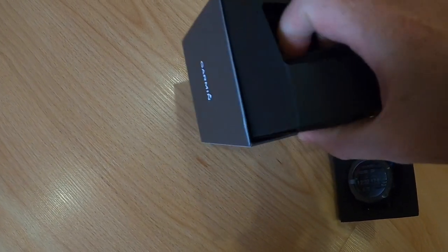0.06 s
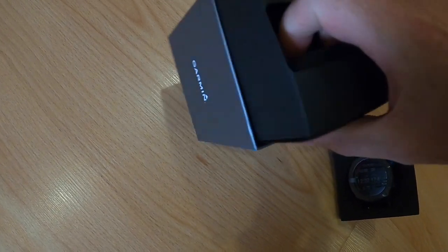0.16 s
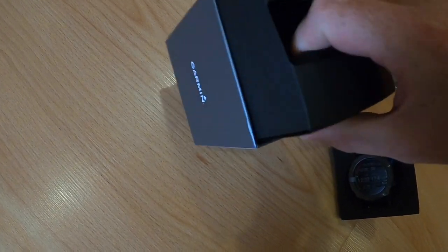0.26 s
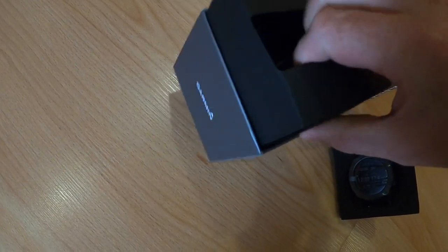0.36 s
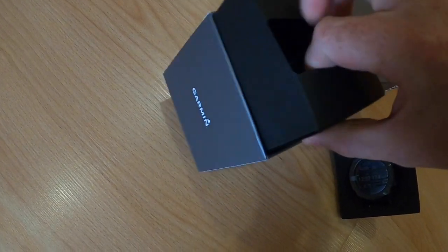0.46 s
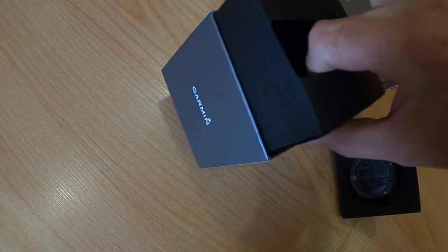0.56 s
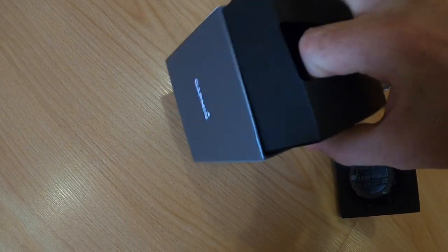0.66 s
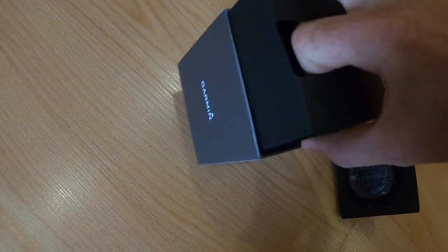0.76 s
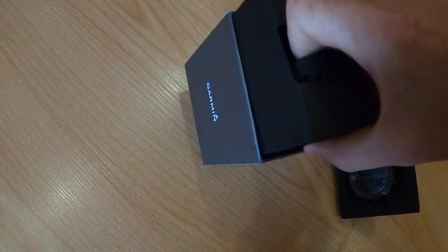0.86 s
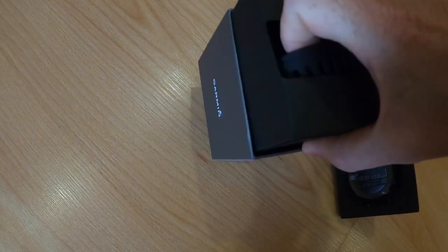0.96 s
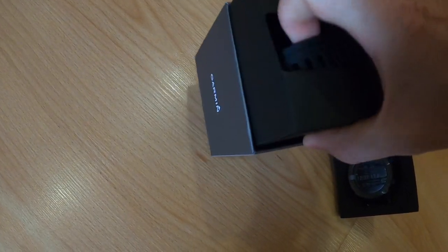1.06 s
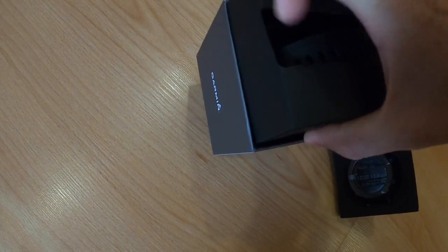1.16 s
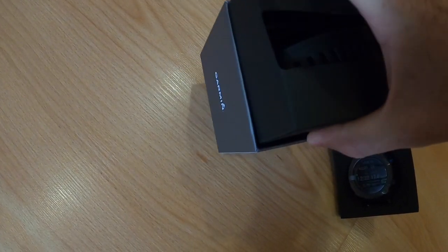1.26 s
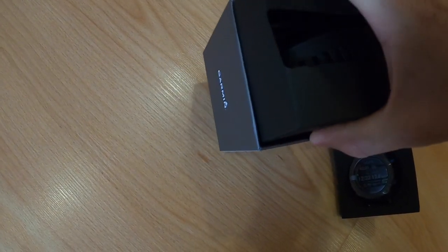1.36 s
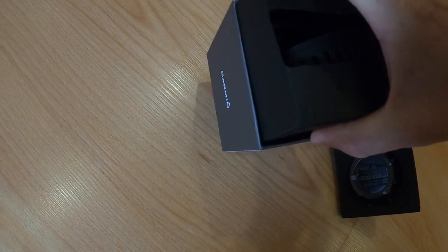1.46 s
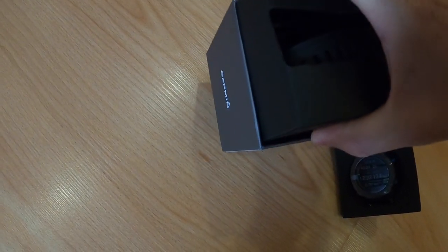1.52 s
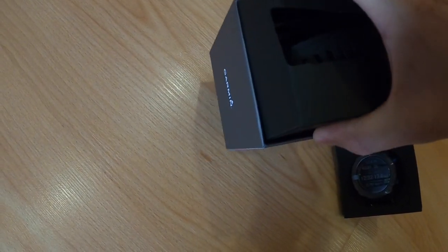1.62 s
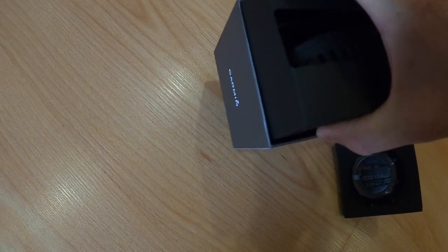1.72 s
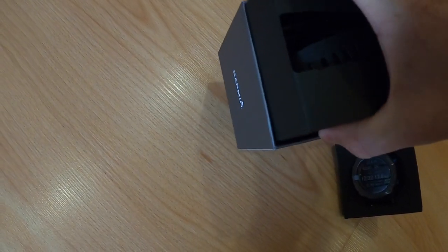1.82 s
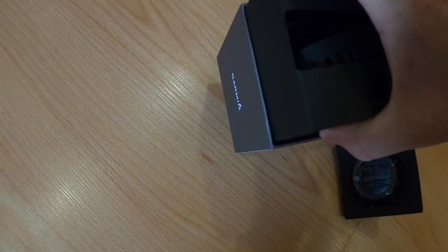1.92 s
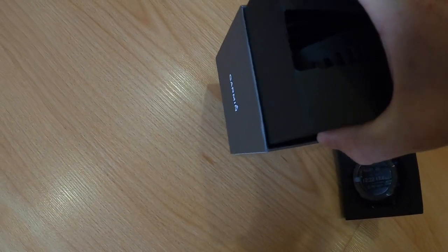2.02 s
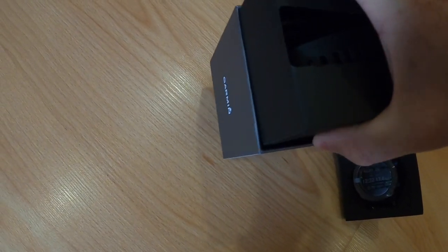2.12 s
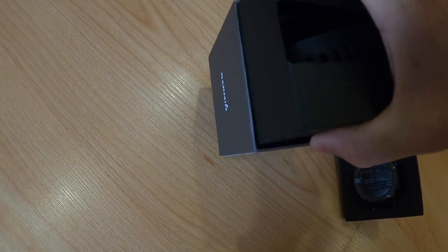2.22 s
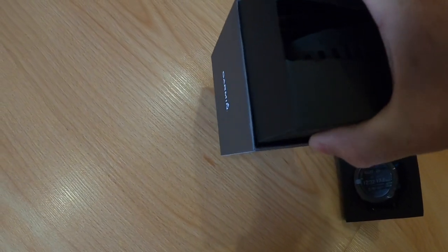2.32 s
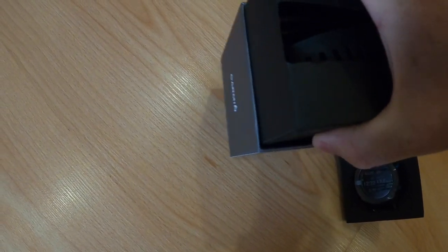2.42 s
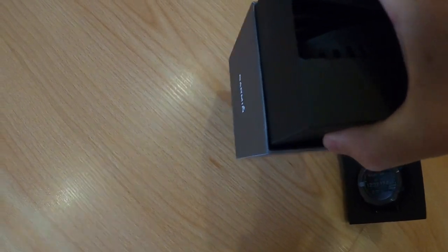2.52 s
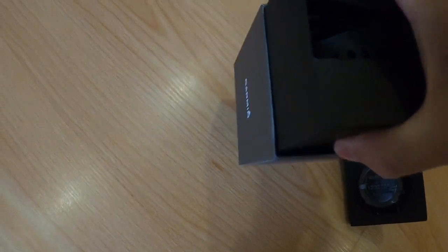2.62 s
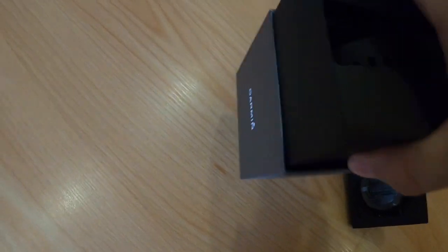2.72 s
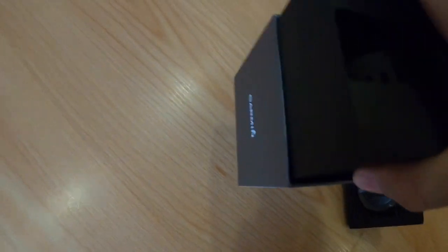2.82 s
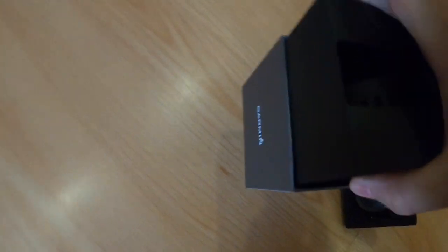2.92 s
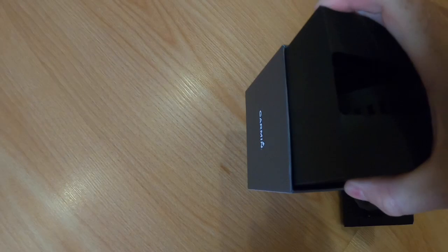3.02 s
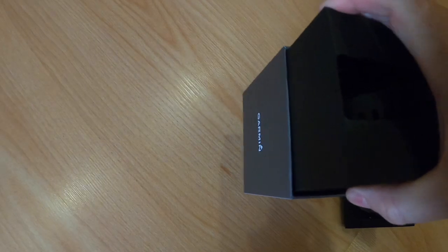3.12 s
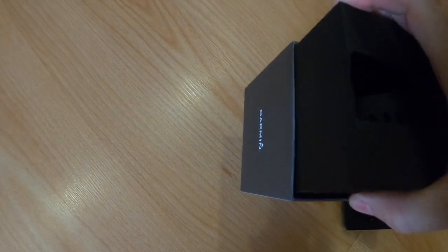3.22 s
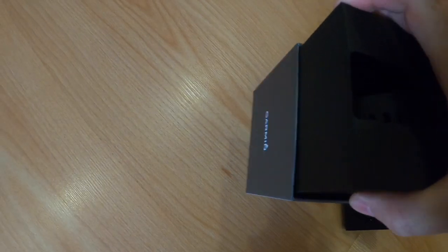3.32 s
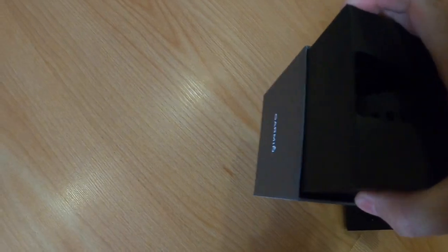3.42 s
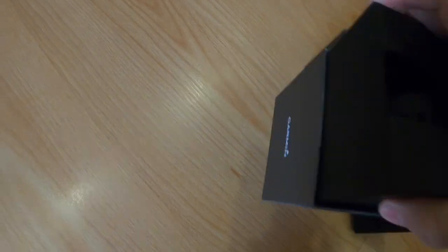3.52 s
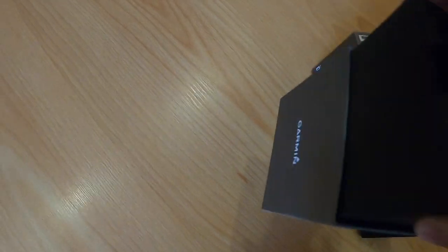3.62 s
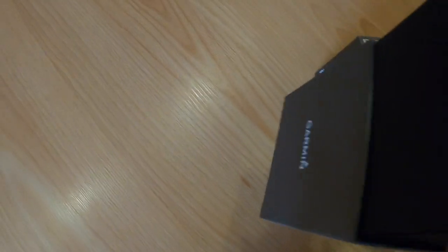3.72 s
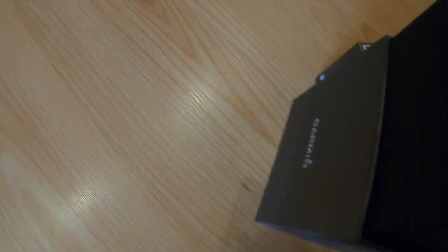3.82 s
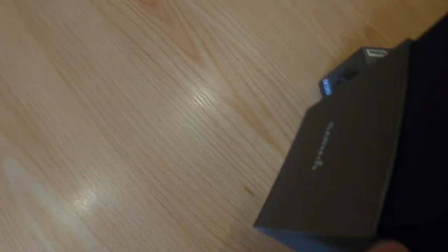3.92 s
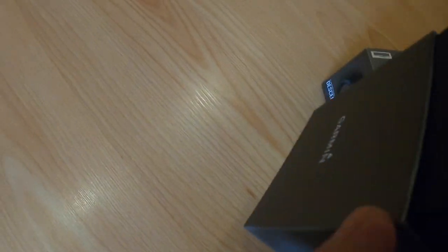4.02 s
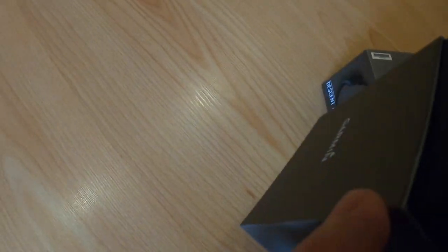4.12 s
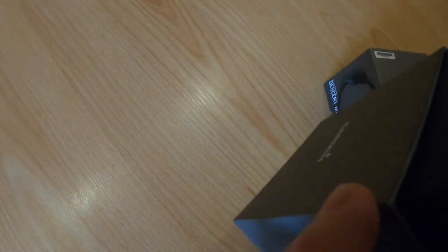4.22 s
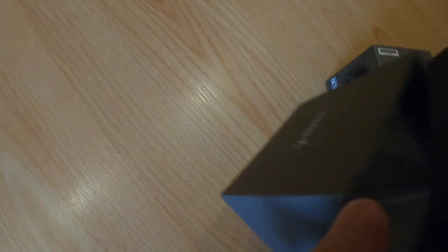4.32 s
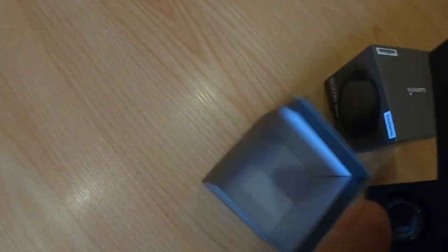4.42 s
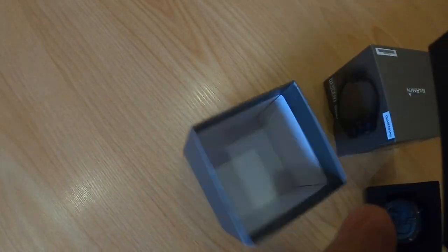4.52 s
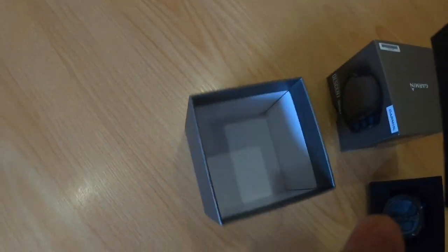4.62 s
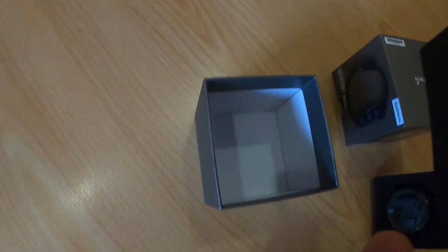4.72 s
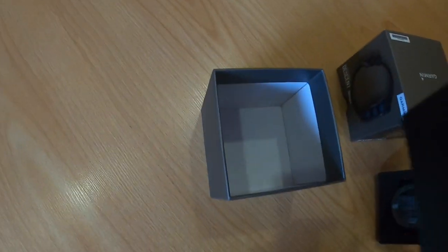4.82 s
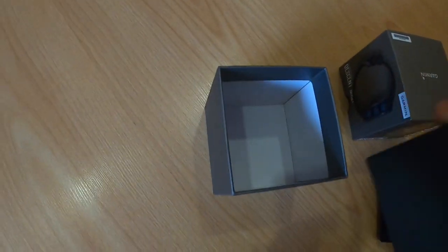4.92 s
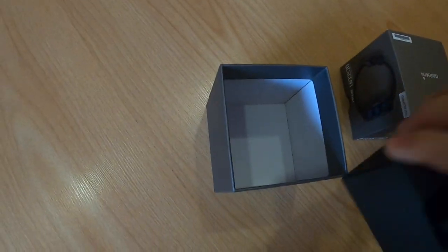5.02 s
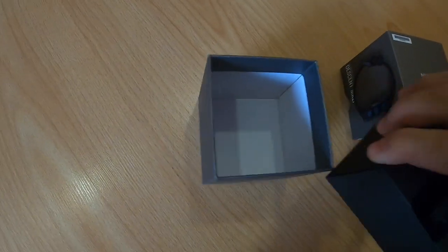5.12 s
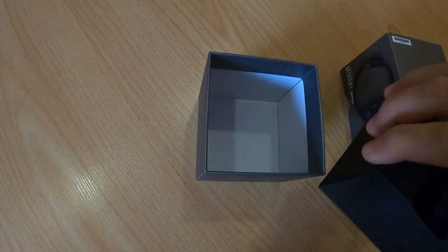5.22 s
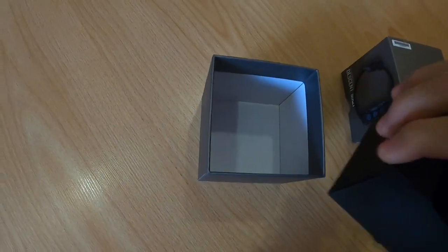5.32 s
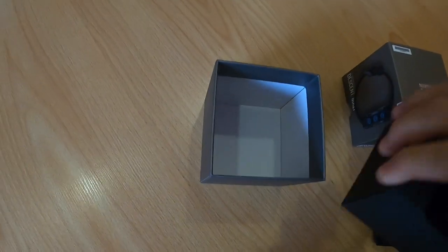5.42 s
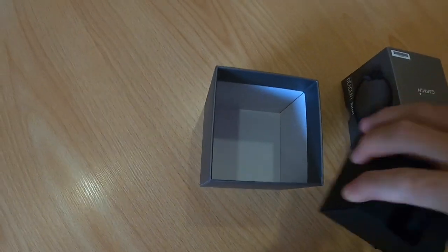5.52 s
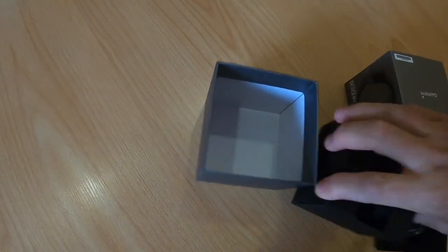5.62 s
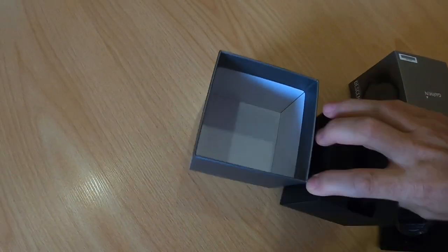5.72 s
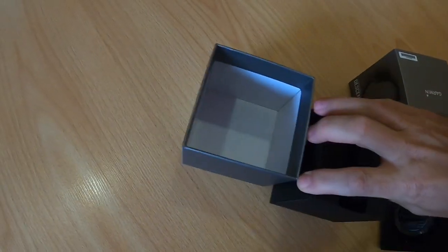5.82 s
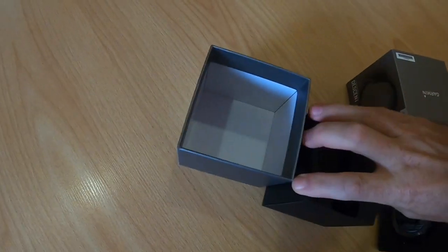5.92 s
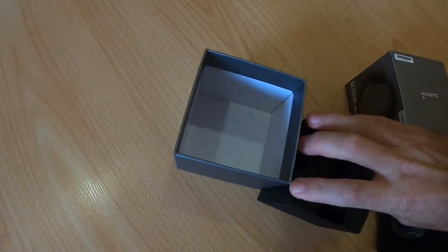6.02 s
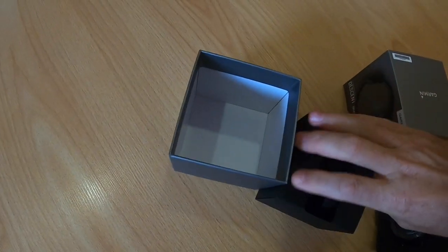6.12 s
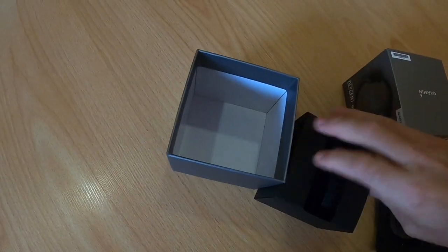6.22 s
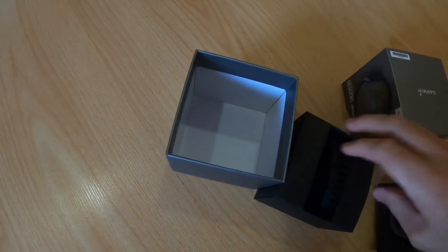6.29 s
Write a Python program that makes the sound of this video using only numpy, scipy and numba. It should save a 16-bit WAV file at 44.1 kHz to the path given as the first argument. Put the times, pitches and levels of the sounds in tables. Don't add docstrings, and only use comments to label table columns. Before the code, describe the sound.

A stiff cardboard box is handled very close to a small stereo microphone above a wooden table, slightly right of centre, in a small room with faint low ventilation hum. From 0 to 0.4 s come firm hollow knocks with crisp edges, dry rasps and short squeaks. Between 0.8 and 1.5 s lighter taps and sliding card, with brief droning and squeaking; near 2 s a rubbing squeak, then scattered taps around 2.4-2.6 s, and soft air puffs near 2.8 s. From 3 to 3.9 s it is sparse: small touches and palm shifts. At 4.2-4.4 s the lid scrapes free with a low breathy suck of air. At 4.5 s it drops, the loudest sound, a hollow wooden knock bouncing rapidly until about 4.67 s. The hum ducks while a short room tail fades. Small tap at 5.1 s, near quiet, then scuffs and knocks at 5.7-6.2 s, the last one sharper.

```python
import sys
import numpy as np
from scipy import signal
from scipy.fft import rfft, irfft, next_fast_len
from scipy.io import wavfile
from scipy.ndimage import uniform_filter1d
from numba import njit

SR = 44100
rng = np.random.default_rng(int(sys.argv[2]) if len(sys.argv) > 2 else 0)


def linear_from_db(decibels):
    return 10 ** (np.asarray(decibels, float) / 20)


def master(y):
    cut = np.clip(np.atleast_2d(y).T, -1, 1)
    pcm = np.round(cut * 32767)
    wavfile.write(sys.argv[1], SR, pcm.astype(np.int16))


N = 280299
TIME = np.arange(N) / SR
FREQ = np.maximum(np.fft.rfftfreq(N, 1 / SR), 1)


def unit(x):
    return x / np.sqrt(np.mean(x ** 2))


def read(table):
    hz, value = np.transpose(table)
    return np.interp(np.log(FREQ), np.log(hz), value)


def shape(x, gain):
    return irfft(rfft(x, N) * gain, N)


def band(x, lo_hz, hi_hz):
    return signal.sosfilt(signal.butter(2, [lo_hz, hi_hz], "band", fs=SR, output="sos"), x)


def walk(rate):
    hold = int(SR / rate)
    levels = np.repeat(rng.standard_normal(N // hold + 1), hold)
    return uniform_filter1d(levels, hold)[:N]


@njit
def svf(x, hz, k):
    y, b, l = np.empty(len(x)), 0., 0.
    for i in range(len(x)):
        g = np.tan(np.pi * hz[i] / SR)
        v = (b + g * (x[i] - l)) / (1 + g * (g + k))
        b, l, y[i] = 2 * v - b, l + 2 * g * v, k * v
    return y


# f/Hz, level/dB per Hz
HUM = [(24, -42.5), (110, -12), (156, 1.5), (260, -1), (430, -18), (1570, -18), (4340, -39.5), (15000, -44)]
# f/Hz, likeness/0-1
LIKENESS = [(130, 1), (290, 0.95), (640, 0.58), (1410, 0.71), (3100, 0.04), (15000, 0)]


def ventilation():
    hum_db, motor_hz, motor_db = -51.5, 64.9, -10
    duck_at_s, duck_db, duck_in_s, duck_out_s = 4.686, -24.5, 0.064, 0.58
    like = np.clip(read(LIKENESS), 0, 1)
    mid, side = (rfft(rng.standard_normal(N)) * linear_from_db(read(HUM)) for _ in range(2))
    common = mid * np.sqrt(1 + like)
    opposed = side * np.sqrt(1 - like) * np.array([[1], [-1]])
    hum = irfft(common + opposed, N)
    hum = hum / np.std(band(hum[0], 148.4, 333)) * linear_from_db(np.array([[-1.5], [1.5]]))
    motor = unit(band(rng.standard_normal(N), motor_hz - 5, motor_hz + 5))
    since = np.maximum(TIME - duck_at_s, 0)
    ducked_db = duck_db * (1 - np.exp(-since / duck_in_s)) * np.exp(-since / duck_out_s)
    flicker_db = 1.0 * walk(5)
    return (hum + linear_from_db(motor_db) * motor) * linear_from_db(hum_db + ducked_db + flicker_db)


# t/s, level/dB, half-length/s
PUFFS = [(.1, -64, 0.11), (.9, -80, 0.04), (2.57, -72, 0.025), (2.718, -47, 0.031), (2.825, -41.5, 0.056),
         (3.75, -65, 0.028), (3.96, -53.5, 0.12), (4.187, -42.5, 0.085), (4.32, -39, 0.052),
         (4.505, -33.5, 0.054), (4.644, -49.5, 0.017), (5.121, -65.5, 0.026), (5.407, -63, 0.073),
         (5.813, -58, 0.083), (6.18, -70, 0.094)]


def draughts():
    still_air_db = -72.5
    air = unit(band(rng.standard_normal((2, N)) + 0.22 * rng.standard_normal(N), 13, 76))
    gust = linear_from_db(still_air_db + 4.1 * walk(3.6))
    for s, db, half in PUFFS:
        gust = gust + linear_from_db(db) * np.exp(-((TIME - s) / half) ** 2)
    return air * gust


BITE_S = 0.0054


def strokes(start, end, value):
    swell, first_grip = 0.31, 0.94
    held = np.zeros(N)
    for a, b, v in zip(start, end, value):
        span = held[int(a * SR):int(b * SR)]
        rise = np.linspace(first_grip, first_grip + (1 - first_grip) / swell, len(span))
        span[:] = np.maximum(span, v * np.clip(rise, 0, 1))
    keep = np.exp(-1 / (0.0082 * SR))
    bite = uniform_filter1d(held, size=int(BITE_S * SR))
    ease = signal.lfilter([1 - keep], [1, -keep], held)
    return np.maximum(bite, ease)


def current_stroke(start):
    return np.clip(np.searchsorted(start - BITE_S, TIME) - 1, 0, None)


def fibre_grains():
    snaps_per_s, snap_db = 250, 14
    grip = linear_from_db(1.5 * walk(70) + 3 * walk(300))
    uneven = rng.standard_normal(N) * linear_from_db(2.22 * rng.exponential(size=N))
    snap = rng.random(N) < snaps_per_s / SR
    return unit(grip * uneven * (1 + linear_from_db(snap_db) * snap))


# start t/s, end t/s, hollow level/dB, hollow f/Hz, scrape level/dB re hollow
BRUSHES = [(0, 0.028, -44, 1070, -10), (0.246, 0.263, -40, 1050, -5), (0.308, 0.344, -48, 970, 3),
           (0.354, 0.404, -42.5, 950, -7.5), (0.4, 0.464, -47.5, 950, -14), (0.82, 0.88, -39.5, 1026, -11),
           (0.855, 0.914, -48, 526, 1), (1.202, 1.231, -59, 850, 0), (1.396, 1.446, -50.5, 594, -8.5),
           (2.205, 2.233, -60.5, 1037, -5), (2.374, 2.386, -38, 1050, -14.5), (2.989, 3.03, -46.5, 407, -6),
           (3.392, 3.422, -56, 1030, -10), (3.828, 3.85, -44, 580, -14), (4.31, 4.358, -38.5, 428, -11),
           (4.342, 4.361, -33.5, 570, -3), (5.13, 5.187, -63, 612, 3.5), (5.527, 5.575, -69.5, 1350, 2.5),
           (5.611, 5.668, -67.5, 1192, 7.5), (5.685, 5.75, -48.5, 770, -4.5),
           (5.965, 6.038, -51.5, 1480, -8), (6.053, 6.113, -47.5, 605, -9), (6.12, 6.143, -63.5, 426, 2)]
# start t/s, end t/s, hollow level/dB, hollow f/Hz, scrape level/dB re hollow
SLIPS = [(0.017, 0.047, -35, 900, -18), (0.069, 0.074, -36, 900, 0), (0.173, 0.221, -39, 960, -2),
         (0.214, 0.221, -45, 867, 4.5), (0.267, 0.28, -39, 1084, 0), (0.66, 0.725, -59, 1013, -0.5),
         (0.725, 0.752, -58, 1180, 7.5), (0.917, 0.944, -49, 570, 3.5), (0.945, 0.982, -54.5, 564, -1.5),
         (0.96, 1.024, -56, 1170, 6.5), (1.045, 1.103, -45.5, 537, -2), (1.091, 1.119, -36.5, 529, 1.5),
         (1.174, 1.197, -46.5, 825, -1), (1.249, 1.262, -34.5, 500, 1.5), (1.387, 1.394, -40.5, 634, 0.5),
         (1.487, 1.523, -51.5, 1118, 0.5), (1.908, 1.953, -41.5, 567, -2.5), (1.953, 2.012, -43, 1170, 2),
         (2.015, 2.069, -43, 554, -13.5), (2.619, 2.643, -39.5, 520, -5), (3.515, 3.555, -42, 900, -3.5),
         (3.657, 3.715, -49.5, 993, -3), (4.236, 4.273, -36.5, 520, -9.5), (4.373, 4.379, -35.5, 610, -0.5)]
# start t/s, end t/s, hollow level/dB, # hollow
# f/Hz, hiss level/dB re hollow
PRESSES = [(0.055, 0.129, -42, 476, -19), (0.155, 0.184, -40, 645, -21), (0.23, 0.25, -44.5, 950, -12),
           (1.13, 1.146, -38.5, 612, -32), (1.292, 1.308, -47.5, 573, -33), (1.817, 1.913, -57, 415, -19),
           (2.077, 2.099, -46.5, 496, -17.5), (5.204, 5.277, -69, 747, -1),
           (6.163, 6.196, -41, 1720, -33.5), (4.94, 4.98, -78.5, 800, 5), (5.026, 5.05, -79, 798, 5.5),
           (5.073, 5.1, -72, 794, 6), (2.496, 2.613, -51.5, 505, -30), (2.803, 2.853, -56.5, 438, 1),
           (5.296, 5.5, -87, 796, -3.5), (2.96, 2.995, -61, 1200, -3), (3.123, 3.156, -53, 617, -44.5),
           (3.15, 3.224, -58, 425, -21), (3.556, 3.583, -46, 500, -18.5), (3.777, 3.84, -54, 437, -23),
           (3.862, 3.886, -49, 690, -49), (3.922, 3.954, -51, 547, -26.5), (4.11, 4.216, -61.5, 516, -31.5),
           (4.216, 4.25, -42, 643, -22), (5.754, 5.827, -49.5, 420, -12), (5.834, 5.887, -51.5, 696, -13.5),
           (6.324, 6.338, -47, 1000, 0)]
# f/Hz, width/Hz, level/dB
SCRAPE = [(2250, 1100, -4), (3350, 2200, 8), (4000, 210, 5.5), (4650, 1100, -2), (3500, 8900, 2)]


def rubbing(grains):
    slip_hiss_db, brush_hiss_db, press_scrape_db = -23, -2, -17
    rubs = [(a, b, db + rel, db, db + rel + slip_hiss_db, hz) for a, b, db, hz, rel in SLIPS]
    rubs += [(a, b, db + rel, db, db + rel + brush_hiss_db, hz) for a, b, db, hz, rel in BRUSHES]
    rubs += [(a, b, db + press_scrape_db, db, db + rel, hz) for a, b, db, hz, rel in PRESSES]
    start, end, scrape_db, hollow_db, hiss_db, hollow_hz = np.transpose(sorted(rubs))
    walls = np.zeros(N)
    for k, (hz, width, db) in enumerate(SCRAPE):
        walls += (-1) ** k * linear_from_db(db) * svf(grains, np.full(N, 1. * hz), width / hz)
    cavity_hz = hollow_hz[current_stroke(start)] * (1 + 0.03 * walk(60))
    cavity = svf(grains, cavity_hz, 0.12) + 0.35 * band(grains, 240, 1374)
    scrape = strokes(start, end, linear_from_db(scrape_db)) * unit(walls)
    hollow = strokes(start, end, linear_from_db(hollow_db)) * unit(cavity)
    hiss = strokes(start, end, linear_from_db(hiss_db + 5.5)) * unit(band(grains, 5700, 12000))
    return scrape + hollow + hiss


def singing(table, grains, width, wander):
    start, end, hz, db = np.transpose(table)
    wall_hz = hz[current_stroke(start)] * (1 + wander * walk(45))
    voice = svf(svf(grains, wall_hz, width), wall_hz, width)
    return strokes(start, end, linear_from_db(db)) * unit(voice)


# start t/s, end t/s, f/Hz, level/dB
DRONES = [(0.018, 0.028, 1130, -42), (0.052, 0.062, 974, -19), (0.192, 0.206, 958, -26.5),
          (0.21, 0.25, 980, -45), (0.823, 0.85, 1250, -43), (1.045, 1.12, 536, -47),
          (1.249, 1.262, 513, -33.5), (1.96, 2.0, 2250, -51.5), (3.0, 3.03, 854, -54),
          (3.115, 3.15, 525, -42.5), (4.362, 4.371, 340, -41), (4.255, 4.27, 780, -53.5),
          (4.345, 4.362, 604, -32), (4.372, 4.39, 606, -39), (4.474, 4.482, 800, -31.5),
          (4.484, 4.492, 900, -28), (6.322, 6.34, 606, -50)]


def drones(grains):
    return singing(DRONES, grains, width=0.089, wander=0.017)


def blows(table, modes, panel_wave, delay_s, rattle_db):
    crack_s, rattle_t60_s = 0.0014, 0.0977
    out, t = np.zeros(N + 8192), np.arange(8192) / SR
    mode_hz, mode_db, mode_t60 = np.transpose(modes)[:, :, None]
    for s, peak_db, hz, edge_db, contact, body_db in table:
        chance = rng.standard_normal((2, len(modes), 1))
        share_db = mode_db - 5.5 * np.abs(np.log2(mode_hz / hz)) + 2.0 * chance[0]
        swing = np.sin(2 * np.pi * mode_hz * (1 + 0.0054 * chance[1]) * t)
        ring = (swing * linear_from_db(share_db - 60 * t / mode_t60)).sum(axis=0)
        sweep = np.sin(2 * np.pi * (1700 * t + 3.84 * (1 - np.exp(-t / 0.00078))))
        crack = sweep + 0.72 * band(rng.standard_normal(len(t)), 1200, 12000)
        crack = crack * np.exp(-t / crack_s) * (1 - np.exp(-t / 0.0016))
        blow = panel_wave(t, hz, edge_db, contact) + linear_from_db(body_db) * ring * (1 - np.exp(-t / 0.00033))
        blow = blow / np.abs(blow).max() + linear_from_db(edge_db) * crack / np.abs(crack).max()
        rattle = unit(band(rng.standard_normal(len(t)), 370, 2850)) * linear_from_db(rattle_db - 60 * t / rattle_t60_s)
        blow = blow + rattle * (1 - np.exp(-t / 0.0041))
        at = int((s + delay_s) * SR)
        out[at:at + len(t)] += linear_from_db(peak_db) * blow
    return out[:N]


def card_wave(t, hz, edge_db, contact):
    sag, sag_s = 0.54, 0.0011
    turn = 2 * np.pi * hz * (0.808 * t + sag * sag_s * (1 - np.exp(-t / sag_s)))
    return np.sin(turn) * np.exp(-(t / contact) ** 3) * (1 - np.exp(-t / (0.26 * contact)))


# t/s, peak level/dB, panel f/Hz, edge click level/dB re peak
TOUCHES = [(0.019, -38, 1060, -31), (0.149, -29, 613, -24), (0.249, -30.5, 2200, 6), (0.273, -45, 1110, -1),
           (0.323, -43, 2170, 16.5), (0.822, -36.5, 1210, -20), (0.854, -28, 1010, -13),
           (0.868, -33, 900, -15), (0.927, -33.5, 950, -11), (0.858, -25.5, 950, -12),
           (1.409, -33, 640, -22), (1.43, -31, 590, -7), (1.793, -41.5, 415, 1.5), (1.887, -42, 540, -3),
           (1.909, -48, 563, -10), (2.06, -27.5, 770, -11), (2.277, -36.5, 600, -20),
           (2.613, -30.5, 550, -1), (2.901, -36.5, 540, -15), (3.116, -32.5, 570, -15),
           (3.318, -34.5, 555, -7.5), (3.393, -48, 1010, 0.5), (3.52, -30.5, 520, -15.5),
           (3.571, -27, 435, -28), (4.453, -30, 397, -29.5), (5.848, -32, 620, -11), (6.156, -29, 680, -7),
           (5.724, -58, 2120, 3.5), (0.132, -30.5, 630, -22), (0.185, -23, 950, -22.5),
           (0.193, -26, 950, -13), (0.201, -25, 1010, -16), (0.318, -40, 1100, -1), (1.36, -41, 700, -23),
           (1.387, -31.5, 700, -3), (4.135, -37, 649, -20.5), (4.264, -33.5, 850, -15.5),
           (0.272, -38, 2990, 1), (1.658, -44, 786, -15), (1.673, -48, 800, 0), (1.823, -49.5, 600, 2.5),
           (2.288, -41, 695, -3.5), (2.597, -36, 1040, -26), (2.621, -35.5, 590, 3),
           (2.988, -37.5, 410, -1), (5.117, -41, 900, -5), (5.53, -50.5, 1014, -6), (5.611, -59, 1210, -7),
           (6.329, -34, 1050, -10.5)]
# t/s, peak level/dB, panel f/Hz, edge click level/dB re peak, contact/s
KNOCKS = [(0.033, -9.5, 960, -7, 0.0022), (0.057, -20.5, 1100, 4, 0.0017), (0.064, -14.5, 516, -6, 0.0037),
          (0.37, -11.5, 1250, -5, 0.0024), (0.386, -13, 810, -11, 0.00063),
          (0.975, -22, 1285, -5.5, 0.0027), (1.122, -24, 1250, -12, 0.0027), (1.169, -26, 685, -10, 0.0038),
          (1.267, -17, 700, -13, 0.0017), (1.491, -26.5, 1135, -12, 0.0022), (2.377, -23, 600, -10, 0.0032),
          (2.555, -20.5, 1256, 0, 0.0029), (3.83, -20.5, 463, -13, 0.0023), (4.344, -19, 640, -21, 0.0039),
          (4.374, -26.5, 700, -14.5, 0.0074), (4.381, -32.5, 640, -25.5, 0.006),
          (4.352, -24, 576, -10, 0.0025), (4.356, -30, 557, -5, 0.0035), (4.758, -26, 936, -7, 0.0014),
          (5.1205, -31, 983, -20, 0.0026), (4.4855, -25.5, 1050, -28, 0.011),
          (5.663, -18.5, 1010, -4, 0.0012), (5.937, -24, 1900, -6.5, 0.0013),
          (6.034, -24.5, 724, -18, 0.0027), (6.104, -26, 1430, -8, 0.0026),
          (6.114, -27.5, 690, -12, 0.0041), (6.1632, -13.5, 900, -2, 0.0014),
          (6.175, -29.5, 900, -17, 0.002), (6.179, -23.5, 527, -22, 0.0022)]
# f/Hz, level/dB, t60/s
BOX = [(250, 5.5, 0.017), (500, -11.5, 0.033), (682.4, -11, 0.08), (950, 3.5, 0.02), (1250, -14, 0.045),
       (1840, -8, 0.011), (2424, -9.5, 0.043), (3100, 4.5, 0.007), (3470, -21.5, 0.0047)]


def taps():
    touch_contact_s, ring_db = 0.0025, -9.0
    struck = sorted(KNOCKS + [(*touch, touch_contact_s) for touch in TOUCHES])
    struck = [(*tap, ring_db) for tap in struck]
    return blows(struck, BOX, card_wave, delay_s=0.001114, rattle_db=-27.5)


# start t/s, end t/s, f/Hz, level/dB
SQUEAKS = [(0.021, 0.026, 3500, -34.5), (0.056, 0.061, 3600, -32), (0.063, 0.066, 3600, -22),
           (0.071, 0.083, 3480, -46), (0.1, 0.155, 3500, -54), (0.184, 0.225, 2135, -41.5),
           (0.254, 0.26, 2250, -39), (0.317, 0.327, 2250, -46.5), (0.328, 0.336, 4000, -49.5),
           (0.937, 0.943, 3100, -35.5), (1.043, 1.095, 2860, -43), (1.095, 1.122, 2930, -30.5),
           (1.249, 1.26, 2780, -38), (1.387, 1.4, 3100, -38), (1.41, 1.422, 3100, -43.5),
           (1.43, 1.456, 3100, -47.5), (1.94, 1.955, 3250, -39), (1.957, 1.975, 3350, -36.5),
           (1.979, 2.002, 3450, -38.5), (2.028, 2.085, 3300, -55.5), (2.62, 2.642, 3220, -43.5),
           (3.01, 3.03, 3580, -54), (3.15, 3.195, 3270, -63), (3.4, 3.43, 3190, -64),
           (3.52, 3.535, 3240, -46.5), (3.665, 3.68, 3150, -52), (4.25, 4.262, 2230, -42),
           (4.32, 4.33, 2200, -39.5), (4.34, 4.352, 2700, -35), (4.351, 4.362, 1470, -32),
           (4.373, 4.381, 3210, -37.5), (5.665, 5.669, 2770, -31), (5.675, 5.692, 2730, -47),
           (5.7, 5.74, 5970, -53.5), (5.986, 6.014, 5000, -53.5), (6.1645, 6.168, 3190, -31.5)]


def squeaks(grains):
    return singing(SQUEAKS, grains, width=.27, wander=.015)


# t/s, peak level/dB, f/Hz, length/s
THUMPS = [
    (3.1, -42, 57, .025),
    (2.807, -32, 108, 0.017),
    (2, -33.5, 222, 0.0086),
    (4.7, -36, 70, 0.029),
    (4.303, -35.5, 32, .03),
    (4.345, -32, 40, 0.027),
    (3.7, -41, 137, .012),
    (1.6, -36, 198, 0.012),
]


def thumps():
    left_db, sag = 4, .3
    out = np.zeros(N)
    for s, db, hz, length in THUMPS:
        t = np.arange(int(3 * length * SR)) / SR
        turn = 2 * np.pi * hz * t * (1 - sag * t / (3 * length))
        swing = -np.sin(turn) * np.exp(-(t / length) ** 2)
        out[int(s * SR):int(s * SR) + len(t)] += linear_from_db(db) * swing
    return out * linear_from_db(np.array([[.5], [-.5]]) * left_db)


# t/s, f/Hz, level/dB
SUCTION = [
    (4.1, 56.7, -62),
    (4.16, 60.6, -59.5),
    (4.2, 81.3, -56),
    (4.25, 124, -62),
    (4.29, 83, -52.5),
    (4.351, 50.5, -50.5),
    (4.389, 45.6, -49.5),
]


def suction():
    s, hz, db = np.transpose(SUCTION)
    ring = unit(svf(rng.standard_normal(N), np.interp(TIME, s, hz), 1.0))
    rush = unit(band(rng.standard_normal(N), 160, 436))
    return (ring + linear_from_db(10.5) * rush) * linear_from_db(np.interp(TIME, s, db, left=-120, right=-120))


def table_wave(t, hz, edge_db, contact):
    first_hz, half_s, length_s = 1760, .00108, .0034
    spread = np.sin(2 * np.pi * first_hz * half_s * np.log(1 + t / half_s))
    fade = np.exp(-(t / length_s) ** 4) + .3 * np.exp(-(t / length_s / 2) ** 2)
    return spread * fade * (1 - np.exp(-t / (contact * linear_from_db(-edge_db / 2)))) ** 2


# t/s, peak level/dB, panel #
# f/Hz, edge click level/dB re peak, ring level/dB
BOUNCES = [(4.4838, -20, 850, -26, -22), (5.1234, -24.5, 600, -28, -18), (4.4939, 2, 700, -14, -20),
           (4.507, -8, 480, -28, -19), (4.5184, -4, 440, -10, -12), (4.5371, -13, 480, -36, -20),
           (4.572, -24, 500, -36, -16), (4.6091, -12, 650, -24, -21), (4.6193, -8, 660, -19, -16),
           (4.6275, -11.5, 660, -24, -20), (4.641, -22, 650, -36, -20), (4.6462, -14, 660, -36, -19),
           (4.671, -29, 300, -36, -20), (5.6676, -23, 500, -20, -24), (5.6714, -22, 500, -25, -24),
           (5.7555, -21, 500, -24, -24), (6.1657, -14, 520, -14, -16)]
# f/Hz, level/dB, t60/s
LID = [(175.2, -1, 0.29), (252.4, -2.5, 0.2), (310, -11.5, 0.0096), (436, 4, 0.13), (540, 6, 0.028),
       (612, -3, 0.1), (696, -1, 0.029), (770, -4, 0.044), (900, -15, 0.038), (1130, -12.5, 0.049),
       (1486, -25, 0.05), (1915, -32, 0.037), (2780, -33, 0.027)]


def lid_drop():
    corner_contact_s = 0.00013
    landings = [(s, db, hz, edge, corner_contact_s, ring) for s, db, hz, edge, ring in BOUNCES]
    return blows(landings, LID, table_wave, delay_s=0, rattle_db=-35.5)


# f/Hz, t60/s, level/dB
ROOM = [(206, 0.98, -24), (500, 0.43, -24), (1290, 0.82, -16.5), (2665, 1, -16), (6540, 1, -23),
        (11100, 0.4, -34.5)]


def room(x):
    t, tails = np.arange(SR) / SR, 0
    for hz, t60, wet_db in ROOM:
        noise = band(rng.standard_normal((2, SR)), hz / 1.66, hz * 1.92)
        tails = tails + noise * linear_from_db(wet_db - 60 * t / t60) * np.clip(t / 0.012 - .3, 0, 1)
    tails = tails + .5 * tails[::-1]
    return signal.fftconvolve(x[None], tails * linear_from_db(-13.5), axes=1)[:, :N]


# t/s, level/dB
TAIL_LEVEL = [
    (4.49, -28.5),
    (4.5, -15.5),
    (4.64, -8.5),
    (4.72, -5.5),
    (4.8, -9.5),
    (5.099, -7.5),
    (5.4, -33),
    (6.16, -19.5),
    (6.18, -20.5),
    (6.36, -23),
]


def swell_tail(tail):
    s, db = np.transpose(TAIL_LEVEL)
    return tail * linear_from_db(np.interp(TIME, s, db))


def stirred(tail):
    swing_rad, changes_per_s, split_hz = 1.6, 700, 1800
    treble = signal.sosfilt(signal.butter(4, split_hz, "high", fs=SR, output="sos"), tail)
    body = signal.sosfilt(signal.butter(4, split_hz, fs=SR, output="sos"), tail)
    turning = np.exp(1j * swing_rad * walk(changes_per_s))
    return body + np.real(signal.hilbert(treble, next_fast_len(N))[:, :N] * turning)


# f/Hz, level/dB
LEFT_SHADE = [(60, -1), (300, -4.5), (1500, -3.4), (2800, -2.6), (6000, -4.5), (10000, -7), (14000, -9)]


def left_port(direct):
    lag, scatter_db, scatter_s = 2.53, -4, 0.00088
    paths = rng.standard_normal(256) * np.exp(-np.arange(256) / SR / scatter_s)
    bent = np.convolve(band(direct, 5000, 17000), paths / np.linalg.norm(paths))[:N]
    bent = bent * walk(460)
    shade = linear_from_db(read(LEFT_SHADE) - 2 * (FREQ > 5500))
    return shape(direct + linear_from_db(scatter_db) * bent, shade * np.exp(-2j * np.pi * FREQ * lag / SR))


# f/Hz, level/dB
MIC = [(40, 6), (300, 2), (1500, 2), (4000, 5), (8000, -1.5), (12000, -18), (15800, -22), (17000, -42.5)]


def scene():
    background = ventilation() + draughts()
    grains = fibre_grains()
    box = rubbing(grains) + drones(grains) + taps() + squeaks(grains)
    background = background + thumps() + suction()
    drop = lid_drop()
    direct = box + drop
    tail = swell_tail(room(box + linear_from_db(-6.5) * drop))
    ports = linear_from_db(0.5) * np.array([left_port(direct), direct])
    return shape(ports + background + stirred(tail), linear_from_db(read(MIC)))


def roll_off(x):
    return signal.sosfilt(signal.butter(12, 16100, fs=SR, output="sos"), x)


def record(dry):
    mix = np.tanh(0.61 * dry) / 0.76
    return roll_off(mix)


dry = scene()
out = record(dry)
master(out)
```